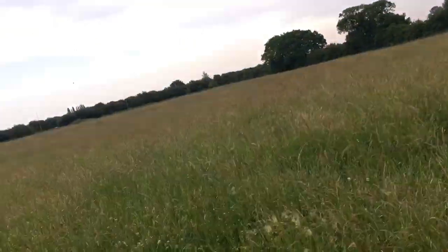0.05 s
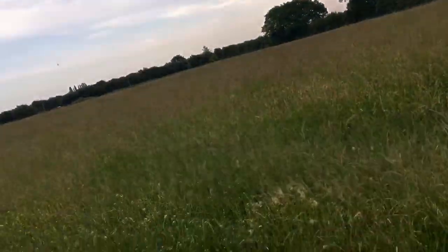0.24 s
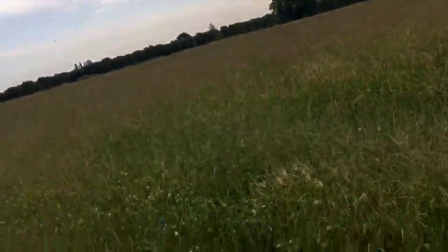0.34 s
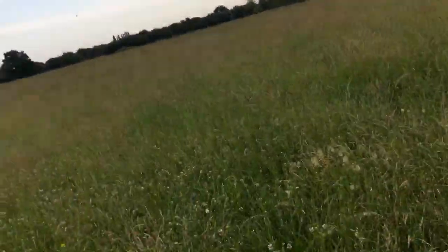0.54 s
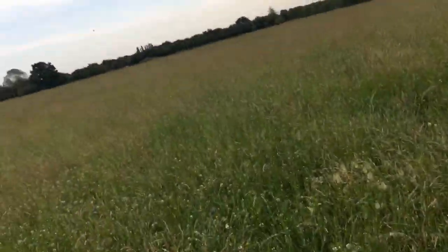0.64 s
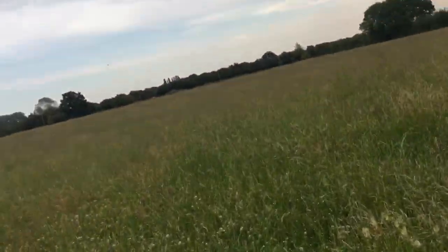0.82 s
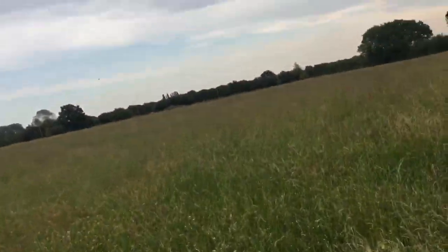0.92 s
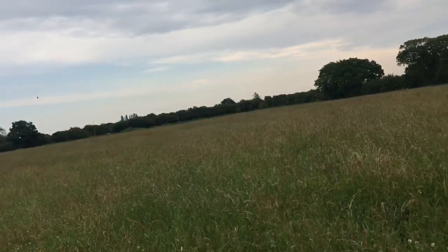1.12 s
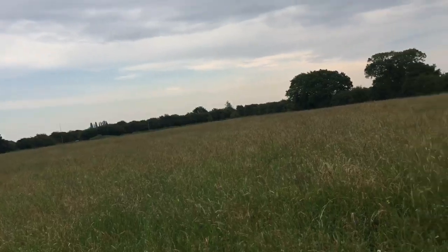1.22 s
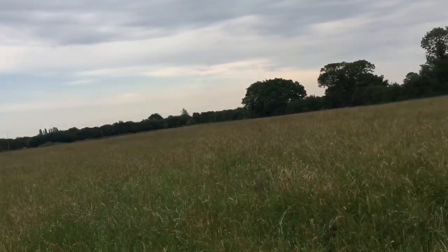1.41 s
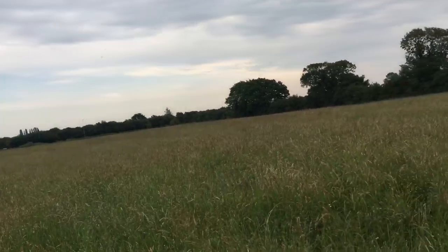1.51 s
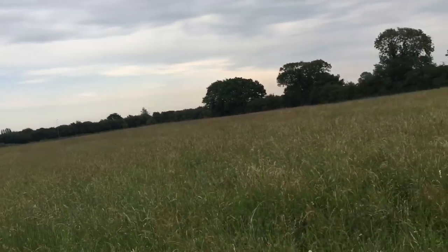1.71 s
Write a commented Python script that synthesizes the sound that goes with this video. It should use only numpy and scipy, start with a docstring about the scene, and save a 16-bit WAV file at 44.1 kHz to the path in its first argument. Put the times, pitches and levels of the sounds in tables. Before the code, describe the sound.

A sharp handling knock on the microphone, with light wind and faint birds in a field.

```python
"""An open meadow, with a hand-held camera swinging over it. Light wind buffets the microphone
above a steady distant wash, and cloth brushes by in two swells. Small birds whistle far off.
The grip slips and knocks the casing, which rings and rattles. Fingers tap it dully twice
and later scrape it once."""
import sys
import numpy as np
from scipy import signal
from scipy.fft import rfft, irfft
from scipy.io import wavfile
from scipy.ndimage import uniform_filter1d

SR = 44100
rng = np.random.default_rng(int(sys.argv[2]) if len(sys.argv) > 2 else 0)


def generate_wav(signal):
    """Clip the signal to [-1, 1] and save it as 16-bit WAV at the path in sys.argv[1]."""
    frames = np.transpose(np.atleast_2d(signal))
    scaled = np.clip(frames, -1, 1) * 32767
    pcm = np.round(scaled).astype(np.int16)
    wavfile.write(sys.argv[1], SR, pcm)


N = 77175
TIME = np.arange(N) / SR


def amp(db):
    """Turns decibels into a number to multiply a sound by."""
    return 10 ** (np.asarray(db) / 20)


def unit(x):
    """Scales a signal to an average strength (rms) of one."""
    return x / np.sqrt(np.mean(x ** 2) + 1e-20)


def level_at(spectrum, hz):
    """Looks up the level in dB between a table's frequencies, spaced as the ear hears pitch."""
    table_hz, db = np.transpose(spectrum)
    return np.interp(np.log(hz + 1), np.log(table_hz + 1), db)


def add(mix, start_s, sound):
    """Mixes a sound in at a given time."""
    part = mix[max(round(start_s * SR), 0):][:len(sound)]
    part += sound[:len(part)]


def noise(spectrum):
    """Noise with the balance of bass and treble that a table gives."""
    gain = amp(level_at(spectrum, np.fft.rfftfreq(N, 1 / SR)))
    return unit(irfft(rfft(rng.standard_normal(N)) * gain, N))


def drift(rate_hz):
    """A smooth random wobble, up to about the given rate."""
    hz = np.fft.rfftfreq(N, 1 / SR)
    return unit(irfft(rfft(rng.standard_normal(N)) / (1 + (hz / rate_hz) ** 4), N))


def decay(t60):
    """A fade that falls 60 dB in t60 seconds."""
    return np.exp(-np.log(1000) * TIME / t60)


def patchy(x, depth_db):
    """Lets small patches of time and frequency swell and fade."""
    slices = signal.stft(x, nperseg=512)[2]
    patches = uniform_filter1d(rng.standard_normal(slices.shape), size=7, axis=0)
    patches = unit(uniform_filter1d(patches, size=8, axis=1))
    return unit(signal.istft(slices * amp(depth_db * patches), nperseg=512)[1][:N])


# tone of the air over the field (frequency [Hz], relative level [dB])
AIR_SPECTRUM = [(25, -5), (60, 11.5), (130, 0), (250, 0), (420, -6), (620, -8), (950, 0), (1500, -5),
                (2100, -11), (2800, -16), (5000, -23.5), (9000, -24.5), (15500, -23)]
def air():
    """The steady, faraway wash of the open field."""
    return amp(-58) * patchy(noise(AIR_SPECTRUM), depth_db=1.54)


# how the wind rises and falls (time [s], relative level [dB])
GUSTS = [(0, -50), (.028, -43), (.06, -66), (.11, -51.5), (.175, -40), (.25, -50), (.385, -51.5),
         (.495, -58), (.53, -45), (.565, -53.5), (.65, -52), (.69, -49.5), (.755, -43.5), (.8, -63),
         (.88, -52), (1.01, -52.5), (1.2, -60), (1.26, -50), (1.33, -58.5), (1.46, -66), (1.51, -50.5),
         (1.56, -55.5), (1.595, -47), (1.68, -47.5), (1.71, -54.5), (1.74, -48)]
# tone of its rumble (frequency [Hz], relative level [dB])
WIND_SPECTRUM = [(20, -65), (30, -13.5), (45, -1.5), (62, -2.5), (85, -9.5), (125, -18.5), (200, -30),
                 (400, -39.5), (1200, -66)]
def wind():
    """Air swirls at the microphone and makes a low rumble that follows the gusts."""
    swirls = noise(WIND_SPECTRUM)
    strength = np.sqrt(uniform_filter1d(abs(signal.hilbert(swirls)) ** 2, size=900))
    even_rumble = unit(swirls / strength)
    gust_db = np.interp(TIME, *np.transpose(GUSTS))
    return amp(gust_db - 1.5) * even_rumble


# how loudly the cloth slides (time [s], level [dB])
CLOTH_SWELLS = [(0, -63), (.06, -60.5), (.14, -58.5), (.28, -54.5), (.4, -50), (.5, -51), (.59, -55.5),
                (.68, -70), (.96, -67), (1.03, -59), (1.08, -55), (1.12, -62.5), (1.21, -52), (1.29, -52),
                (1.42, -58), (1.57, -74), (1.75, -64.5)]
# tiny ticks of the cloth (time [s], level [dB])
CLOTH_TICKS = [(.741, -63), (0.796, -57.5), (1.071, -51.5), (1.635, -55.5)]
# tone of the rubbing (frequency [Hz], relative level [dB])
CLOTH_SPECTRUM = [(200, -9), (900, -4), (1800, -1), (2600, -6.5), (3500, -4.5), (4700, -11), (6200, -4.5),
                  (7600, -6), (9400, -1), (10400, -7), (11500, -1.5), (13000, -1.5), (15300, -1)]
def cloth():
    """Rubbing makes a bright, grainy hiss: slow swells, one quick slip and a few ticks."""
    level = amp(np.interp(TIME, *np.transpose(CLOTH_SWELLS)))
    slip_db = np.linspace(-48.5, -41.5, round(.024 * SR))  # the grip slips just before the knock
    add(level, start_s=.1523, sound=amp(slip_db) * signal.windows.tukey(len(slip_db), .25))
    for start_s, db in CLOTH_TICKS:
        add(level, start_s, amp(db) * decay(t60=.018))
    grain = amp(drift(rate_hz=100))
    return level * grain * patchy(noise(CLOTH_SPECTRUM), depth_db=1.37)


def bird_note(hz, db):
    """A bird sings a nearly pure tone with soft ends and a slightly shaky pitch and level."""
    jitter, flutter_db, ramp_s = .008, 1.8, .008
    cycles = np.cumsum(hz * (1 + jitter * drift(rate_hz=290)[:len(hz)])) / SR
    level = amp(db + flutter_db * drift(rate_hz=210)[:len(hz)])
    soft_ends = signal.windows.tukey(len(hz), 2 * ramp_s * SR / len(hz))
    return np.sqrt(2) * level * soft_ends * np.sin(2 * np.pi * cycles)


# whistles that drop onto a held note
# (time [s], length [s], held pitch [Hz], drop [share of held pitch], relative level [dB])
BIRD_WHISTLES = [(.096, .042, 4950, .2, -63), (.440, .04, 4900, .25, -66), (.791, .094, 4260, .5, -63),
                 (1.115, .094, 4290, .5, -65.5), (1.424, .048, 3700, .45, -68),
                 (1.741, .09, 4200, .45, -68)]
# short chirps
# (time [s], length [s], first pitch [Hz], middle pitch [Hz], last pitch [Hz], relative level [dB])
BIRD_CHIRPS = [(.135, .03, 4850, 4450, 3900, -67), (.278, .035, 5800, 5350, 4900, -71),
               (.39, .03, 5700, 5200, 4600, -70), (.483, .035, 4700, 4100, 3700, -65),
               (.525, .045, 3650, 3550, 3200, -70), (.645, .09, 7250, 7250, 7150, -76),
               (.72, .032, 3750, 3500, 2900, -70), (.755, .09, 3150, 3330, 3130, -73),
               (.896, .03, 3550, 3350, 2700, -70), (.952, .03, 2500, 2570, 2500, -73),
               (1.365, .05, 6300, 6750, 6350, -67), (1.405, .025, 3350, 3250, 2700, -67),
               (1.46, .032, 4700, 4620, 4750, -74), (1.503, .125, 7200, 7130, 7170, -79),
               (1.599, .018, 3600, 4100, 4700, -73)]
def birds():
    """Distant birds whistle and chirp, and the tree line scatters a faint echo."""
    drop_s, fade_db = .0065, -5
    waver_hz, waver_share, waver_db = 15, .022, 2.5
    calls = np.zeros(N)
    for start_s, length, hz, drop, db in BIRD_WHISTLES:
        t = np.arange(0, length, 1 / SR)
        waver = np.cos(2 * np.pi * waver_hz * (t - 2 * drop_s))
        pitch = hz * (1 + drop * np.exp(-t / drop_s) + waver_share * waver)
        add(calls, start_s, bird_note(pitch, db + waver_db * waver + fade_db * t / length))
    for start_s, length, first, middle, last, db in BIRD_CHIRPS:
        curve = np.polyfit([0, .5, 1], [first, middle, last], 2)
        pitch = np.polyval(curve, np.linspace(0, 1, round(length * SR)))
        add(calls, start_s, bird_note(pitch, db))
    scatter = rng.standard_normal(N) * decay(t60=.62)
    echo = signal.fftconvolve(calls, scatter / np.linalg.norm(scatter))[:N]
    return calls + amp(-11) * echo


def through_casing(x, lag_s):
    """Low notes travel more slowly as the casing bends; lag_s is the delay at 200 Hz."""
    hz = np.fft.rfftfreq(2 * len(x), 1 / SR)
    phase = -4 * np.pi * lag_s * np.sqrt(200 * hz)
    return irfft(rfft(x, 2 * len(x)) * np.exp(1j * phase))[:len(x)]


# knocks on the casing (time [s], relative level [dB], contact time [s])
KNOCKS = [(0.1729, -18, 0.000057), (.1785, -28, 0.00013)]
# notes the casing rings at (frequency [Hz], relative level [dB], time to fade by 60 dB [s])
CASING_NOTES = [(62, -21, .06), (168, -29, .42), (228, -26, .16), (287, -28, .14), (510, -8, .05),
                (638, 1, .033), (800, -7, .016), (1010, -8, .018), (1750, -21, .03), (2080, -14, .022),
                (2280, -16, .02), (2950, -9, .018), (3800, -21, .016), (7000, -17, .01)]
# tone of the gritty crack (frequency [Hz], relative level [dB])
CRACK_SPECTRUM = [(100, -18), (400, -14), (700, -15), (1400, -7), (2400, -12), (3200, 27), (4600, -6),
                  (7000, -1), (15000, -16)]
# tone of loose parts buzzing on (frequency [Hz], relative level [dB])
RATTLE_SPECTRUM = [(60, 2.5), (130, -2.5), (240, 11), (420, -10), (750, -11.5), (1500, -23), (4000, -30),
                   (15000, -35)]
def knock(db, contact_s):
    """A short push sets the casing ringing, with a crack and a brief rattle."""
    ring = sum(amp(level) * decay(t60) * np.cos(2 * np.pi * hz * TIME)
               for hz, level, t60 in CASING_NOTES)
    push = np.exp(-TIME / contact_s) * TIME  # longer contact gives a duller ring
    ring = signal.fftconvolve(ring, push / push.sum())[:N]
    crack = amp(-17) * noise(CRACK_SPECTRUM) * decay(t60=.024)
    rattle = amp(-18.5) * noise(RATTLE_SPECTRUM) * decay(t60=.25)
    return amp(db) * through_casing(ring + crack + rattle, lag_s=.00181)


# dull finger taps (time [s], peak level [dB], added brightness [dB per octave])
TAPS = [(0.1803, -38.5, 1), (0.3175, -26.5, -0.5)]
# tone of a tap (frequency [Hz], relative level [dB])
TAP_SPECTRUM = [(20, -20), (70, 3.5), (190, 2), (380, -1), (600, -3), (760, -16.5), (2000, -18),
                (2800, -26.5), (5500, -32.5), (15000, -51)]
def tap(db, brightness_db):
    """A finger gives the casing a muffled thump: the treble arrives first, the bass just after."""
    hz = abs(np.fft.fftfreq(4096, 1 / SR))
    log_gain = np.log(amp(level_at(TAP_SPECTRUM, hz) + brightness_db * np.log2(1 + hz / 200)))
    spectrum = np.exp(np.conj(signal.hilbert(log_gain)))  # packs the sound into a sudden start
    pulse = np.fft.ifft(spectrum).real[:len(hz) // 2]
    thump = through_casing(pulse, lag_s=.00218)
    return amp(db) * thump / abs(thump).max()


# a short, dry finger scrape (time [s], length [s], level [dB])
SCRAPES = [(1.059, 0.032, -57.5)]
# tone of the scrape (frequency [Hz], relative level [dB])
SCRAPE_SPECTRUM = [(100, -17), (400, 3), (1200, 3), (2400, 5), (3200, -1), (4500, -21), (7000, -3),
                   (9000, -21), (15000, -24)]
def scrape():
    """Fingers shift on the casing in one crackly stroke."""
    grain_db = 4
    level = np.zeros(N)
    for start_s, length, db in SCRAPES:
        add(level, start_s, amp(db) * signal.windows.tukey(round(length * SR), .5))
    return level * unit(noise(SCRAPE_SPECTRUM) * amp(grain_db * drift(rate_hz=350)))


def scene():
    """Field, wind, birds and handling sounds meet at one microphone."""
    out = air() + wind() + cloth() + scrape() + amp(-2.5) * birds()
    for start_s, db, contact_s in KNOCKS:
        add(out, start_s, knock(db, contact_s))
    for start_s, db, brightness_db in TAPS:
        add(out, start_s, tap(db, brightness_db))
    return out[None]


def record(dry):
    """The microphone loses the deepest bass, and the camera cuts off the highest treble."""
    lowest_hz, highest_hz = 30, 15860
    bass_cut = signal.butter(2, lowest_hz, "highpass", fs=SR, output="sos")
    treble_cut = signal.firwin(801, highest_hz, window=("kaiser", 9), fs=SR)
    return signal.oaconvolve(signal.sosfilt(bass_cut, dry), treble_cut[None], "same")


dry = scene()
out = record(dry)
generate_wav(out)
```